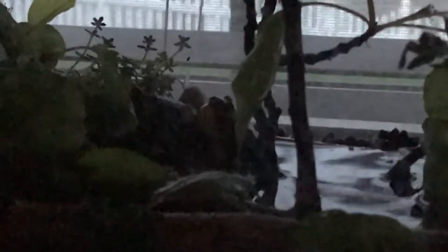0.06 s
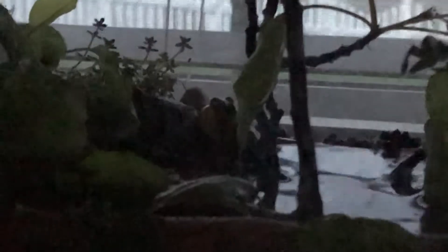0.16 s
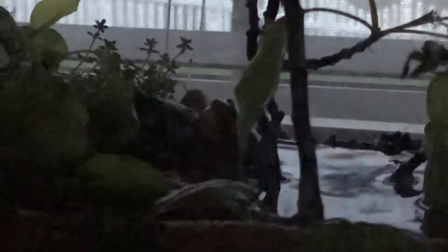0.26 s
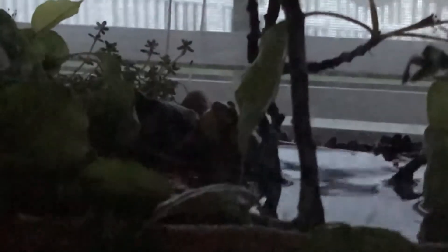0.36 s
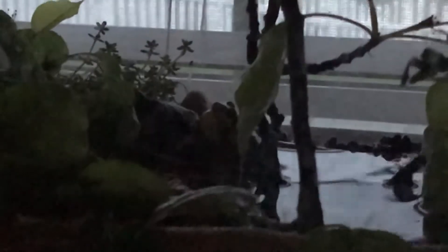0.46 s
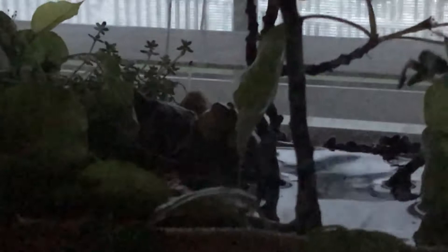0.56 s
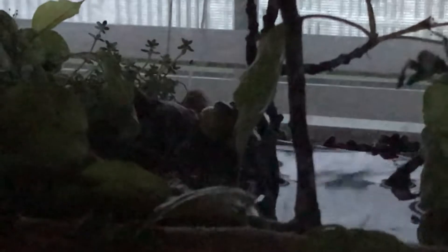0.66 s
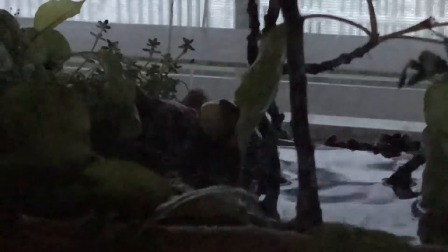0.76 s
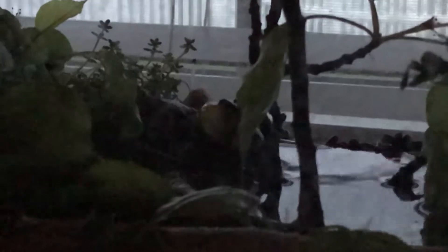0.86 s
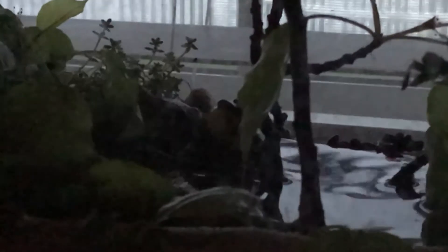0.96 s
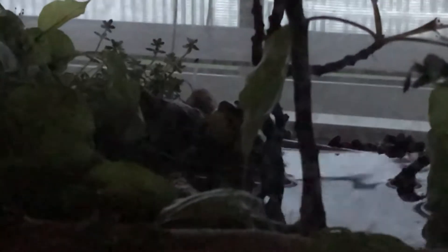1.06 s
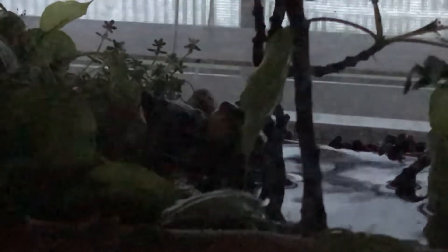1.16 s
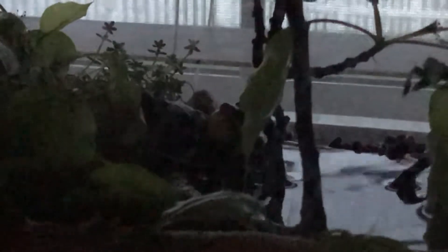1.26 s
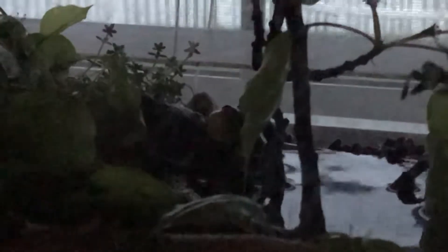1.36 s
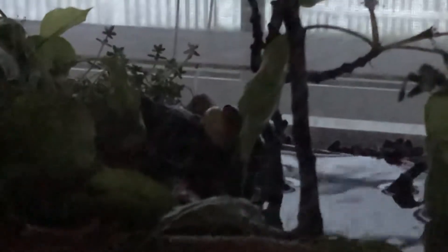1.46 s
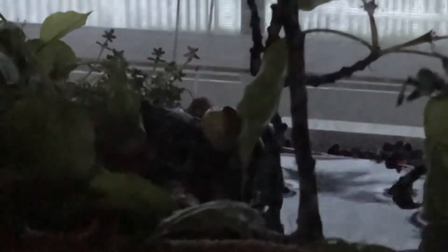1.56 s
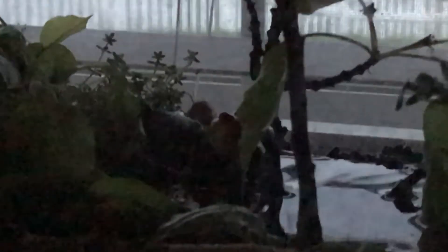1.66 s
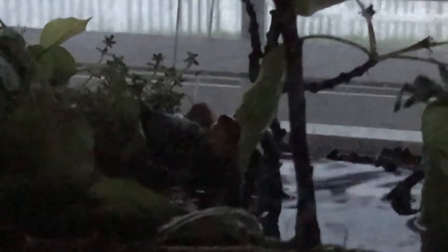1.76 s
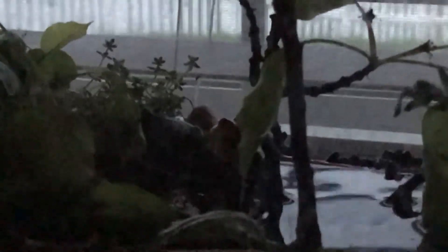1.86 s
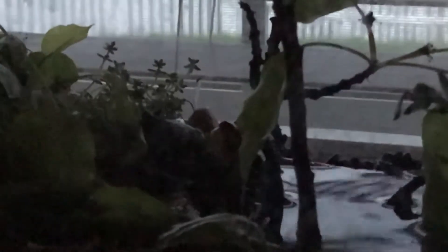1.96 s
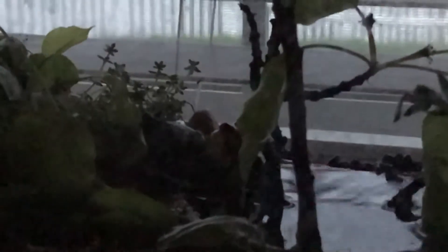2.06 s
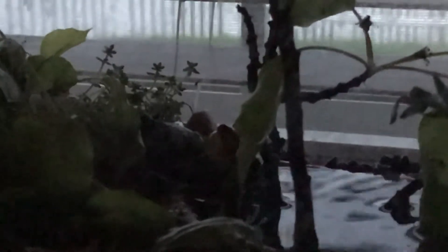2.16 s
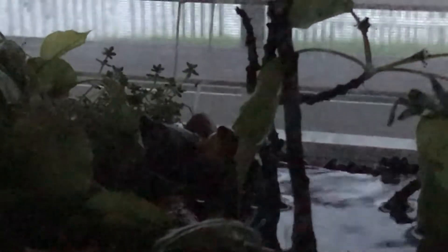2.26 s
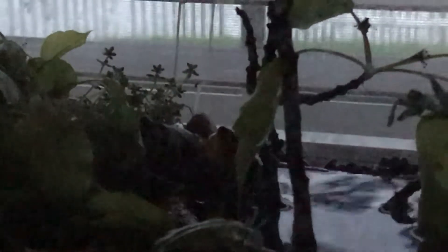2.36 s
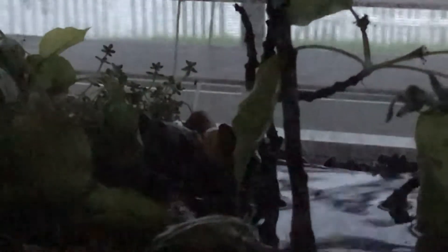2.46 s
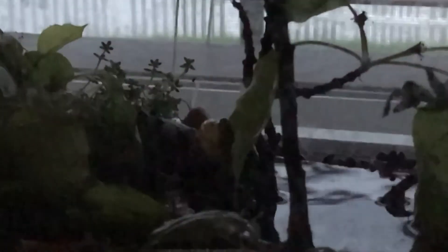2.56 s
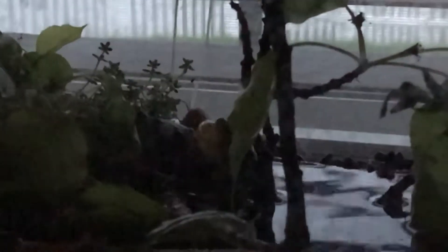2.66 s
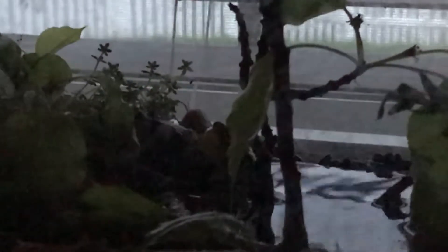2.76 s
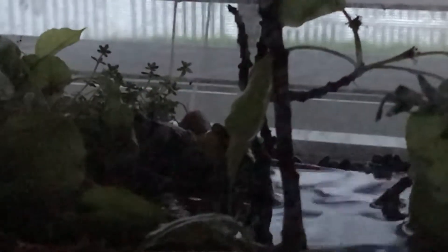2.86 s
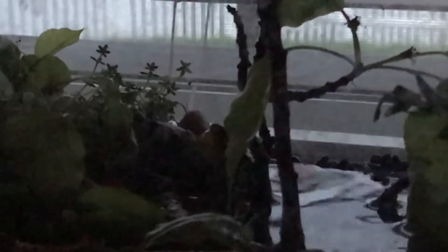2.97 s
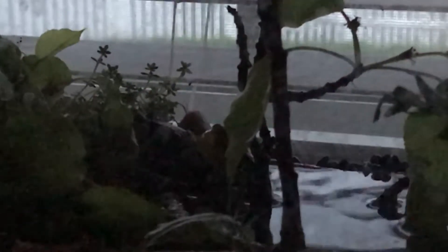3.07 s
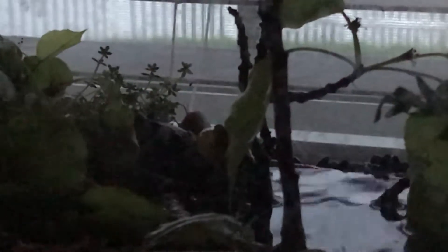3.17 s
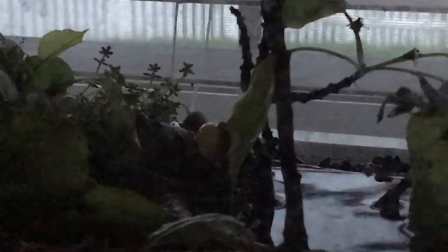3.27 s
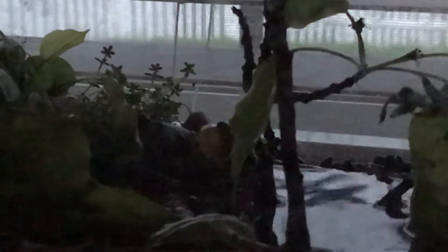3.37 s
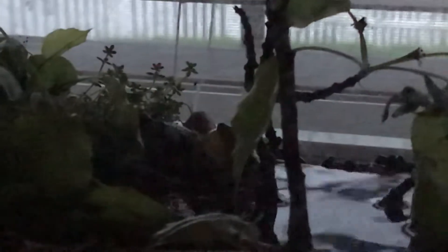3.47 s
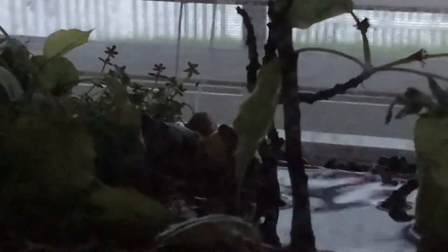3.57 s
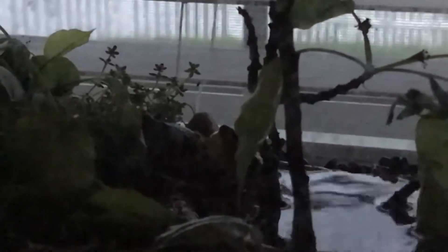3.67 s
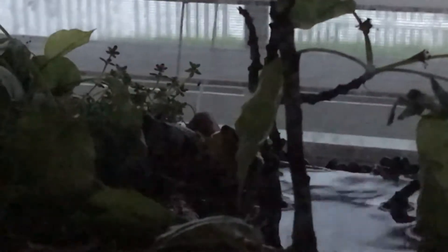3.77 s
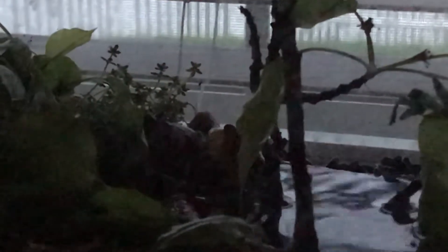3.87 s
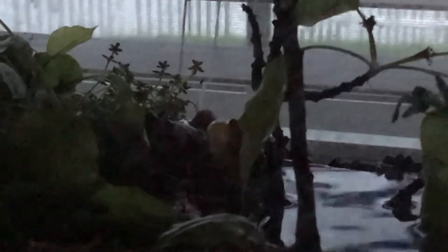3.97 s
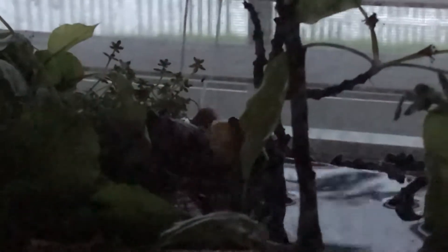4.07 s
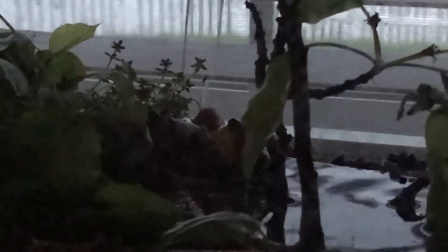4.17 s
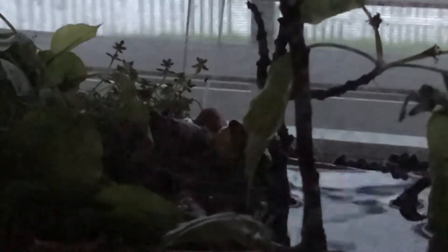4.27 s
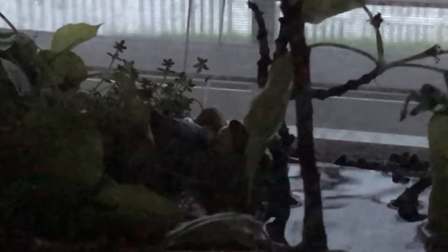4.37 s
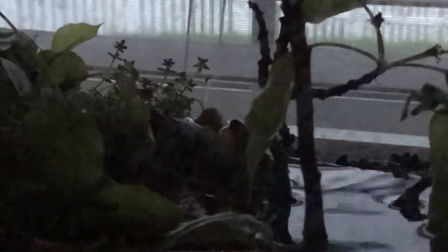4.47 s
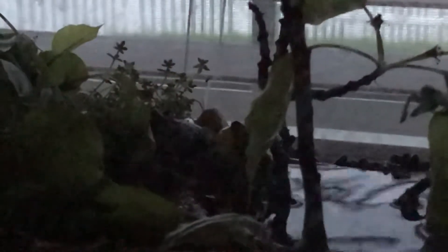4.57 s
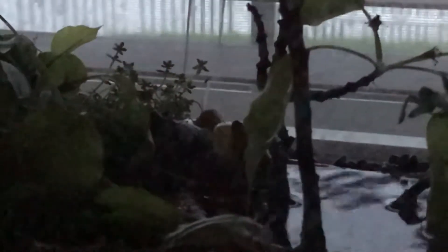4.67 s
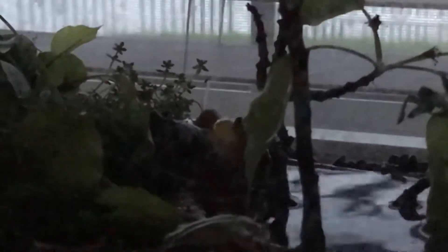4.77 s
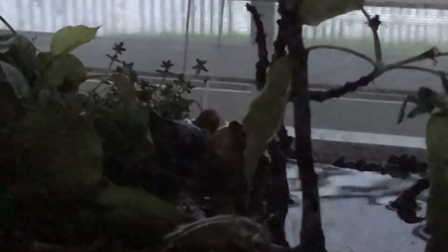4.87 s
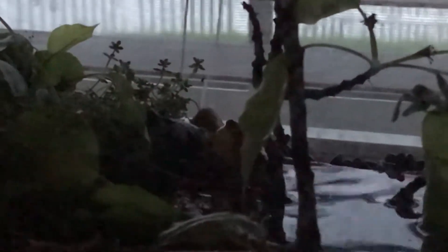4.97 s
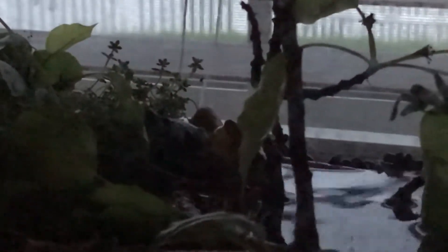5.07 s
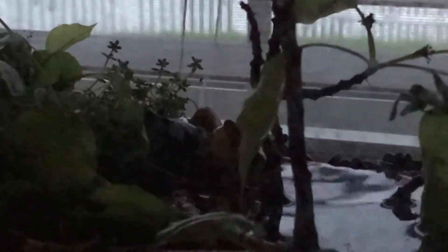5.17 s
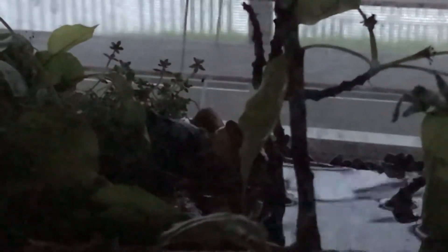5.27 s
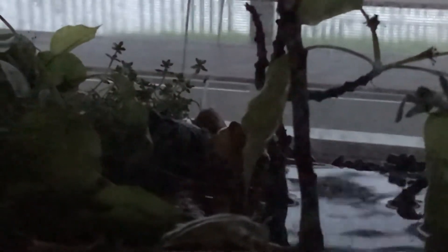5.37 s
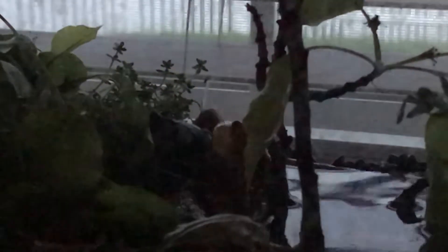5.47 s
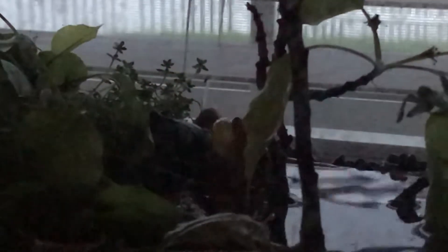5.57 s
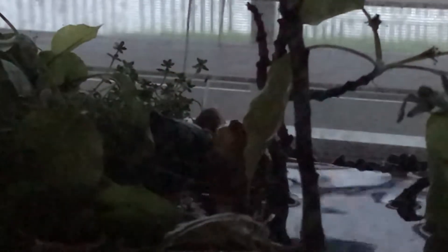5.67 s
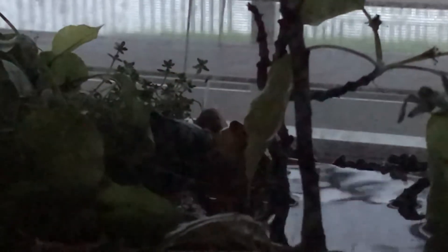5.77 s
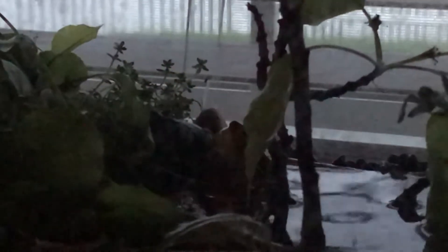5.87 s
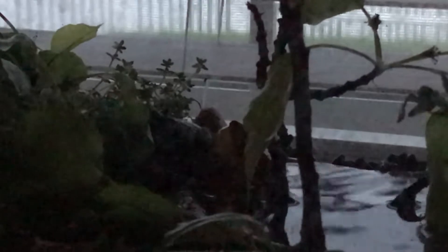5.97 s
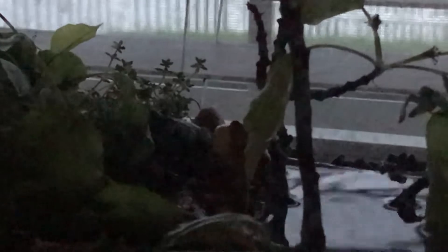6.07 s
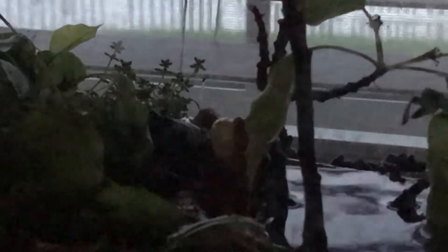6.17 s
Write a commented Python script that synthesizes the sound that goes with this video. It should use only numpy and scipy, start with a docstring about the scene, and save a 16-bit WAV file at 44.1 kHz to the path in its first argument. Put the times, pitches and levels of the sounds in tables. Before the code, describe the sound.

Inside a small indoor glass terrarium, water trickles into a pool throughout: tiny high plinks, ticking spray, fine spatter and softer low plops, all irregular and delicate. A quiet room rumble, thin hiss and very faint motor hum sit beneath. At about 0.7 seconds a tree frog gives a loud, close croak, a coarse rattle of rapid pulses about 0.2 seconds long, starting rough, tightening and brightening upward, then cutting off. More follow at 1.4, 2.5, 3.2, 3.9, 4.65 and 5.45 seconds, with a final one beginning near 6.1, slightly stronger in the later half. Each has a nasal, hard-edged ring and a short boxy echo off the glass. Clear drips stand out in the gaps, notably around 0.5, 1.0, 2.3, 4.45 and 5.2 seconds. Barely noticeable muffled stirrings pass near 2.6 and between 4 and 5 seconds.

```python
"""A small glass terrarium, where a male tree frog croaks eight times.
Each croak is a rattle of about 125 pulses a second. Each pulse adds a flap of the larynx to a few swings
of the vocal cords, which tighten as the call goes on; the vocal sac and glass box colour the voice.
Water trickles into the pool: each drop is a short rising bubble tone with a tick of spray.
Behind it are a hum of steady tones, and shaped noise for the room's rumble, hiss and faint stirrings."""
import sys
import numpy as np
from scipy import signal
from scipy.fft import rfft, irfft
from scipy.io import wavfile

SR = 44100
rng = np.random.default_rng(int(sys.argv[2]) if len(sys.argv) > 2 else 0)


def digitize_waveform(pressure):
    """Quantize a signal to 16-bit integers and store it at the path in sys.argv[1].

    Rows of a 2-D input are taken as channels; values are limited to [-1, 1].
    """
    field = np.atleast_2d(pressure).T
    bounded = np.clip(field, -1, 1)
    quanta = np.round(bounded * 32767).astype(np.int16)
    wavfile.write(sys.argv[1], SR, quanta)


N = 274743

# Spectrum of the room's rumble and hiss, only its shape counts: (f/Hz, relative level/dB)
ROOM_SPECTRUM = [(15, -40), (25, -13), (65, 6.5), (120, -4.5), (200, -8.5), (370, -10.5), (520, -19),
                 (800, -21), (1200, -22.5), (2000, -22), (3400, -21), (7500, -33), (12500, -29.5),
                 (15800, -34)]
# Steady tones of the mains and a motor: (f/Hz, rms level/dB)
HUM_TONES = [(59.3, -69.5), (119, -70), (148.5, -70.5), (205, -78), (356, -78)]
# The clearest drips: (t/s, level/dB, starting bubble pitch f/Hz, splash strength/dB)
CLEAR_DRIPS = [(0.0202, -41, 1140, -7), (0.2604, -45, 3700, -9), (0.4823, -32.5, 4890, -7.5),
               (0.648, -49, 2630, -9), (1.0213, -33.5, 4380, -8.5), (1.1862, -47.5, 4330, 5.5),
               (1.2523, -44, 1156, -10), (1.765, -38, 5460, 2), (1.8818, -45, 3800, 3),
               (1.9057, -39, 2470, 3), (2.0393, -43, 3460, -10), (2.2755, -31, 3480, -9),
               (2.2942, -35, 3600, -1.5), (2.384, -41, 2300, 0), (2.8505, -44, 1640, 8.5),
               (2.943, -44.5, 1540, -15), (3.6032, -43.5, 6080, -1), (3.6892, -39, 3500, 1.5),
               (4.2983, -43.5, 5100, 3.5), (4.4398, -36, 4300, -4), (4.4553, -35.5, 5340, -11),
               (4.589, -44, 5050, -4.5), (5.0803, -42.5, 8560, -4), (5.2052, -33.5, 4120, -6),
               (5.258, -41.5, 5200, -6), (5.7496, -36, 5040, -22), (5.821, -40.5, 3470, -2),
               (5.8461, -44.5, 3430, 4.5), (5.9637, -45.5, 3840, 0), (6.0347, -43, 3530, 7)]
# How the tank's echo dies away, band by band: (f/Hz, time to fall by 60 dB t/s, relative level/dB)
TANK_ECHO = [(494, 0.88, -5), (980, 0.21, 5), (1840, 0.31, 3), (2680, 0.24, 7.5), (4070, 0.33, 5),
             (6600, 0.19, 9), (11200, 0.057, -11)]
# One row a croak: (start t/s, length t/s, effort level/dB, cord tension as a factor on pitch,
# middle of the lock as a share of the length, moment of the push as a share of the length)
CROAKS = [(0.6879, 0.2, -3.5, 1.037, 0.52, 0.75), (1.3948, 0.21, -3, 1.045, 0.55, 0.74),
          (2.492, 0.19, -2.5, 1.104, 0.57, 0.72), (3.1864, 0.19, -2.5, 1.045, 0.61, 0.76),
          (3.8811, 0.19, -1.5, 1.1, .62, 0.68), (4.6509, 0.18, -1.5, 1.057, .6, .68),
          (5.449, 0.18, -1.14, 1.067, 0.65, 0.8), (6.0928, 0.2, -1.9, 1.064, 0.69, 0.58)]
# Broad colour that the throat and vocal sac radiate: (f/Hz, level/dB)
SAC_COLOUR = [(300, -70), (520, -42.5), (780, -14.5), (1020, -4), (1330, -5.5), (1650, -4), (2350, 1),
              (2750, 1), (3120, -10), (4400, -18.5), (6200, -23), (7700, -44), (10300, -57), (15500, -60)]
# Narrow resonances of the frog and its glass box: (f/Hz, width f/Hz, lift level/dB)
RESONANCES = [(946, 95, 5.5), (1144, 93, 5), (1468, 112, 9.5), (1648, 30, -6), (1690, 88, 5.5),
              (1825, 120, 5.5), (1941, 110, 7.5), (2300, 50, 2.5), (2637, 147, 3), (2790, 18.5, -8),
              (2927, 48, 5), (3350, 162, 9.5), (3660, 130, 12), (4020, 71, 9), (8770, 420, 13.5),
              (11550, 200, 20.5), (12500, 980, 11)]
# First echoes off the glass panes: (delay t/s, gain as a plain factor)
PANE_ECHOES = [(.0011, 0.19), (.0024, 0.011), (.0037, .14)]
# Faint muffled stirrings in the room: (start t/s, length t/s, centre f/Hz, level/dB before the fades)
STIRRINGS = [(2.58, 0.43, 212, -55), (2.657, 0.26, 630, -66.5), (3.984, 0.24, 252, -56.5),
             (3.945, 0.34, 600, -58), (4.281, 0.16, 660, -54.5), (4.584, 0.46, 653, -60.5)]

# Phases of a croak, as shares of its length: pressure builds, the cords lock in with the vocal sac,
# a last push, release.
BUILD, LOCK_WIDTH, PUSH_WIDTH, RELEASE_AT = 0.33, 0.19, 0.06, 0.88
# The rattle, in pulses per second: a quick start that settles, a push, then slowing as air runs out.
RATE_HZ, QUICK_START_HZ, PUSH_HZ, SLOWING_HZ = 122.2, 16, 2.6, 13
SETTLE, SLOW_FROM = 0.16, 0.78  # shares of the croak
# Cord pitch before the croak's tension factor: slack pitch, rise, bend of the rise (1 = straight).
SLACK_HZ, TIGHTEN_HZ, TIGHTEN_BEND = 753, 739, 0.81
# Levels (dB) before the croak's effort: at full pressure, change at the very start and very end.
CORDS_DB, CORDS_START_DB, CORDS_END_DB = 3, -15.5, -6.5
FLAP_DB, FLAP_START_DB, FLAP_END_DB = 0.5, -11.5, -13
# Changes (dB): the flap while the cords lock, the cords while locked, the cords in the push.
FLAP_LOCK_DB, LOCK_DB, PUSH_DB = -0.5, -6, 3.5
# Cord brightness (dB per octave): at the start, then gained with pressure, locking and tightening.
TILT_DB, TILT_BUILD_DB, TILT_LOCK_DB, TILT_TIGHTEN_DB = -5, 5, 4, 3.5
# Roughness from 0 to 1: at the start, at full pressure, while locked.
ROUGH_START, ROUGH_FULL, ROUGH_LOCKED = 0.2, 0.9, 0.14


def amp(db):
    """Turns decibels into a gain."""
    return 10 ** (np.asarray(db) / 20)


def unit(x):
    """Scales a sound to an rms (average strength) of one."""
    return x / np.sqrt(np.mean(x ** 2) + 1e-20)


def read(points, hz):
    """Reads between the rows of a table, along a log-frequency axis."""
    f, value = np.transpose(points)
    return np.interp(np.log(hz + 1), np.log(f + 1), value)


def add(mix, s, sound):
    """Mixes a sound in at time s, in seconds."""
    part = mix[max(round(s * SR), 0):][:len(sound)]
    part += sound[:len(part)]


def noise(points, size):
    """Makes noise of rms one with the given spectrum."""
    hz = np.fft.rfftfreq(size, 1 / SR)
    spectrum = rfft(rng.standard_normal(size)) * amp(read(points, hz))
    return unit(irfft(spectrum, size))


def room_rumble(level_db=-59.0):
    """Steady noise, shaped into the rumble and hiss of the room."""
    return amp(level_db) * noise(ROOM_SPECTRUM, N)


def hum():
    """The mains and a motor give steady sine tones, each starting at a random point of its swing."""
    t = np.arange(N) / SR
    out = np.zeros(N)
    for hz, db in HUM_TONES:
        out += amp(db) * unit(np.sin(2 * np.pi * (hz * t + rng.random())))
    return out


def drip(hz, t60, splash_db, rise=4.9, splash_t60=0.029, size=3000):
    """A drop hits the pool: a tick of spray around the pitch of a brief bubble, which rises as it dies."""
    t = np.arange(size) / SR
    tone = np.sin(2 * np.pi * hz * t * (1 + rise * t))
    bubble = 0.9 * tone * amp(-60 * t / t60)
    spray = noise([(hz / 12, -34), (hz / 1.44, -14), (hz, 0), (hz * 1.58, -11), (hz * 3, -27)], size)
    splash = 0.5 * spray * amp(splash_db - 60 * t / splash_t60)
    onset = 1 - np.exp(-t / 0.00033)
    return (bubble + splash) * onset


def trickle(level_db, centre_hz, octaves, spread_db, t60, splash_db, count):
    """Small drops hit the pool at random moments, with scattered pitch and loudness."""
    out = np.zeros(N)
    moments = rng.random(count)
    scatter = np.clip(rng.standard_normal((count, 2)), -2, 1.6)
    for when, (pitch, loud) in zip(moments, scatter):
        drop = drip(centre_hz * 2 ** (octaves * pitch), t60, splash_db)
        add(out, when * N / SR, amp(level_db + spread_db * loud) * drop)
    return out


def water():
    """Clear drips stand out over fine spatter, a thin fizz and low plops, all made of single drops."""
    spatter = trickle(level_db=-56, centre_hz=4613, octaves=0.572, spread_db=9.0,
                      t60=0.017, splash_db=1, count=240)
    fizz = trickle(level_db=-60.5, centre_hz=11350, octaves=0.13, spread_db=1.5,
                   t60=0.012, splash_db=3.5, count=110)
    plops = trickle(level_db=-43.5, centre_hz=1290, octaves=0.22, spread_db=-0.5,
                    t60=0.03, splash_db=-22.5, count=45)
    out = spatter + fizz + plops
    for s, db, hz, splash_db in CLEAR_DRIPS:
        add(out, s, amp(db) * drip(hz, t60=0.022, splash_db=splash_db))
    return out


def tank(x, build_s=0.00057, size=22050):
    """Dense echoes between the glass walls and the room beyond, each band dying at its own speed."""
    taps = rng.standard_normal(size) * (rng.random(size) < 0.2)  # about one sample in five is an echo
    hz, t, bands = signal.stft(taps, SR, nperseg=256)
    t60, db = (read(np.array(TANK_ECHO)[:, [0, k]], hz)[:, None] for k in (1, 2))
    tail = signal.istft(bands * amp(db - 60 * t / t60), SR, nperseg=256)[1]
    tail *= 1 - np.exp(-(np.arange(len(tail)) / SR / build_s) ** 2)
    return signal.oaconvolve(x, tail / np.linalg.norm(tail))[:N]


def course(u, lock_at, push_at):
    """The larynx at share u of a croak: pressure, locking and tightening set pitch, levels and roughness."""
    build = min(u / BUILD, 1)
    lock = np.exp(-((u - lock_at) / LOCK_WIDTH) ** 4)
    push = np.exp(-((u - push_at) / PUSH_WIDTH) ** 2)
    slowing = np.interp(u, [SLOW_FROM, 1], [0, 1])
    release = np.interp(u, [RELEASE_AT, 1], [0, 1])

    rate = RATE_HZ + QUICK_START_HZ * np.exp(-u / SETTLE) + PUSH_HZ * push - SLOWING_HZ * slowing
    cord_hz = SLACK_HZ + TIGHTEN_HZ * u ** TIGHTEN_BEND
    cord_db = CORDS_DB + CORDS_START_DB * (1 - build) + LOCK_DB * lock
    cord_db += PUSH_DB * push + CORDS_END_DB * release
    flap_db = FLAP_DB + FLAP_START_DB * (1 - build) ** 2
    flap_db += FLAP_LOCK_DB * lock + FLAP_END_DB * release
    tilt_db = TILT_DB + TILT_BUILD_DB * build + TILT_LOCK_DB * lock + TILT_TIGHTEN_DB * u
    unlocked_rough = ROUGH_START + (ROUGH_FULL - ROUGH_START) * build ** 2
    rough = unlocked_rough * (1 - lock) + ROUGH_LOCKED * lock
    return rate, cord_hz, cord_db, flap_db, tilt_db, rough


def pulse(swing_hz, tilt_db, slip, open_s, sag, skew, rasp, spread, count=14):
    """The larynx opens once and its tissue swings a few times, the pitch arching with the pressure."""
    u = np.arange(int(open_s * SR)) / (open_s * SR)
    pressure = np.sin(np.pi * u ** skew)
    turns = np.cumsum(swing_hz * (1 - sag * (1 - pressure))) / SR
    turns -= np.interp(0.5, u, turns)  # count the swings from the middle of the pulse
    k = np.arange(1, count + 1)[:, None]
    audible = k * swing_hz < SR / 2
    partials = amp(tilt_db * np.log2(k * swing_hz / 2000)) * audible
    # soft tissue closes like a zip, so the higher partials lag
    swings = (partials * np.cos(2 * np.pi * k * (turns + slip - spread * k))).sum(0)
    air = rasp * np.median(partials) * rng.standard_normal(len(u))
    return pressure * (swings + air)


def radiate(x, size=8192):
    """The vocal sac's broad colour and the narrow resonances act as one filter that rings after each pulse."""
    hz = np.abs(np.fft.fftfreq(size, 1 / SR))
    db = read(SAC_COLOUR, hz)
    for f, width, lift in RESONANCES:
        db = db + lift / (1 + (2 * (hz - f) / width) ** 2)
    # this phase makes the filter respond as early as it can, with no ringing ahead of a pulse
    spectrum = np.exp(np.conj(signal.hilbert(np.log(amp(db)))))
    response = np.fft.ifft(spectrum).real
    return signal.oaconvolve(x, response[:size // 2])[:N]


def frog(level_db=-25, flap_hz=548, flap_tilt_db=-3, jitter_s=0.00016, wobble=0.068, cord_lag_s=0.00019):
    """Each pulse is a fixed-pitch flap of the larynx and a buzz of tightening cords, uneven when rough."""
    out = np.zeros(N)
    for start, length, effort_db, tension, lock_at, push_at in CROAKS:
        t = 0
        for late, sharp, slip, hurry in rng.standard_normal((32, 4)):
            if t > length:
                break
            rate, cord_hz, cord_db, flap_db, tilt_db, rough = course(t / length, lock_at, push_at)
            cord_hz *= tension * (1 + wobble * rough * sharp)
            flap = pulse(flap_hz, flap_tilt_db, slip=0, open_s=0.004504, sag=0.16, skew=0.99,
                         rasp=0.19, spread=0.0601, count=6)
            cords = pulse(cord_hz, tilt_db, slip=0.25 * rough * slip, open_s=0.0044, sag=0.14, skew=1.1,
                          rasp=0.2, spread=0.08)
            when = start + t + jitter_s * rough * late
            add(out, when, flap * amp(effort_db + flap_db))
            add(out, when + cord_lag_s, cords * amp(effort_db + cord_db))
            t += (1 + 0.005 * hurry) / rate
    voice = radiate(out)
    near = voice.copy()
    for delay, gain in PANE_ECHOES:
        add(near, delay, gain * voice)
    return amp(level_db) * near


def stirrings():
    """Faint muffled stirrings in the room: bands of noise that swell and fade smoothly."""
    out = np.zeros(N)
    for s, length, hz, db in STIRRINGS:
        size = int(length * SR)
        spectrum = [(hz / 8, -40), (hz / 2, -14), (hz, 0), (hz * 2, -18), (hz * 8, -60)]
        band = noise(spectrum, 32768)[:size]
        add(out, s, amp(db) * band * signal.windows.hann(len(band)))
    return out


def scene(frog_wet_db=-8, water_wet_db=-7.0):
    """Frog and water share the terrarium and its echoes; the room's own sounds stay without them."""
    background = room_rumble() + hum() + stirrings()
    drops = water()
    voice = frog()
    echoes = tank(amp(frog_wet_db) * voice + amp(water_wet_db) * drops)
    return (voice + drops + echoes + background)[None]


def record(dry, edge_hz=15950):
    """A steep filter takes away the treble above its edge."""
    low_pass = signal.firwin(511, edge_hz, window=("kaiser", 9), fs=SR)
    return signal.oaconvolve(dry, low_pass[None], "same")


dry = scene()
out = record(dry)
digitize_waveform(out)
```